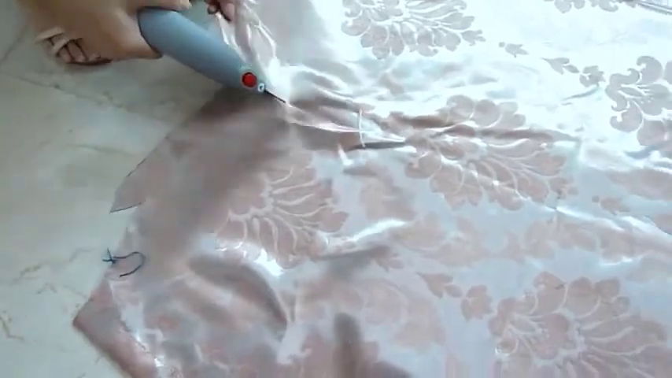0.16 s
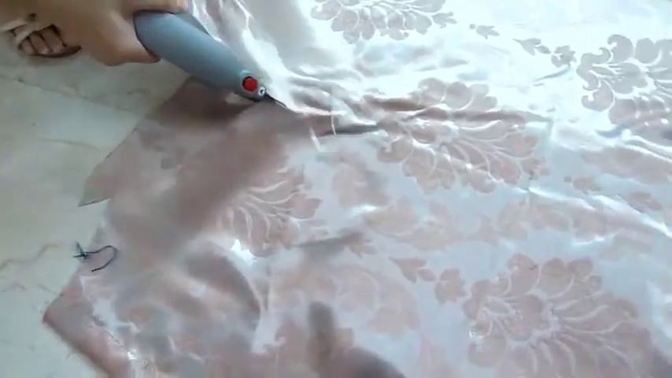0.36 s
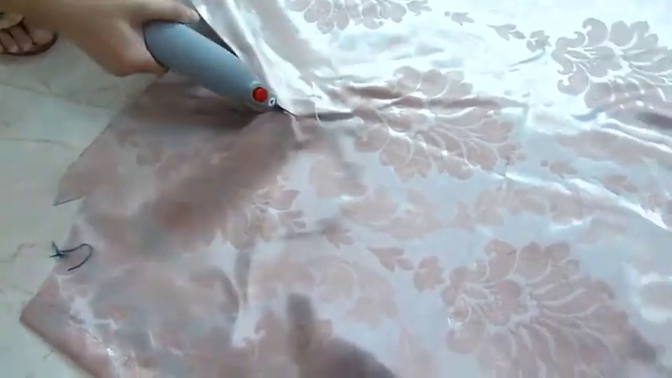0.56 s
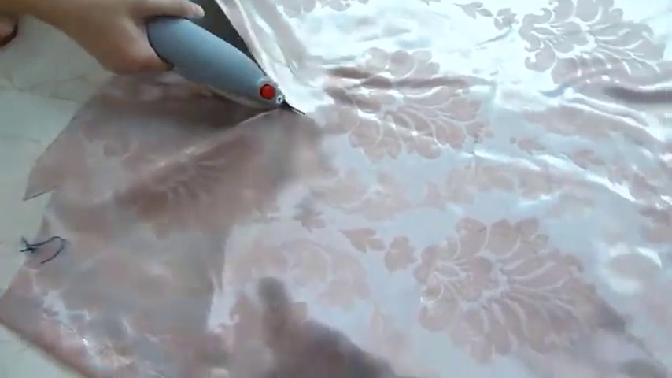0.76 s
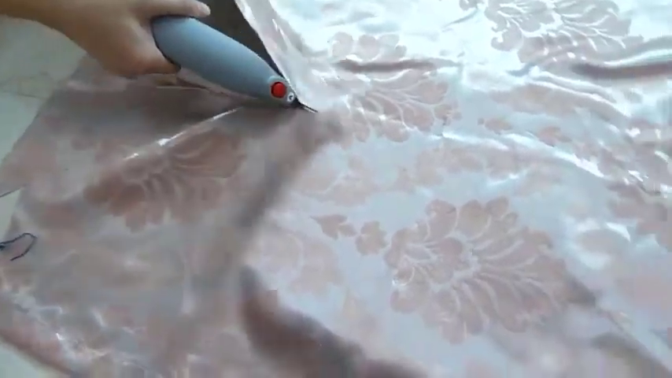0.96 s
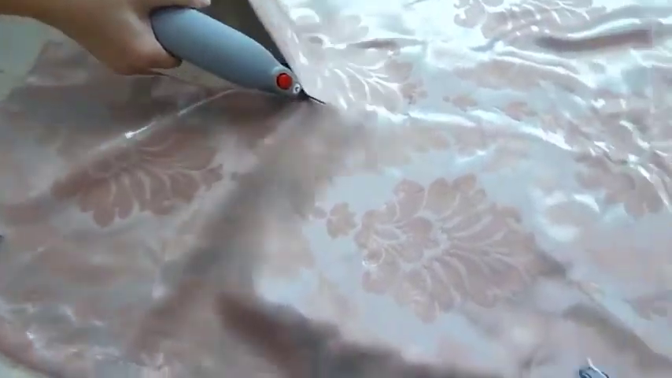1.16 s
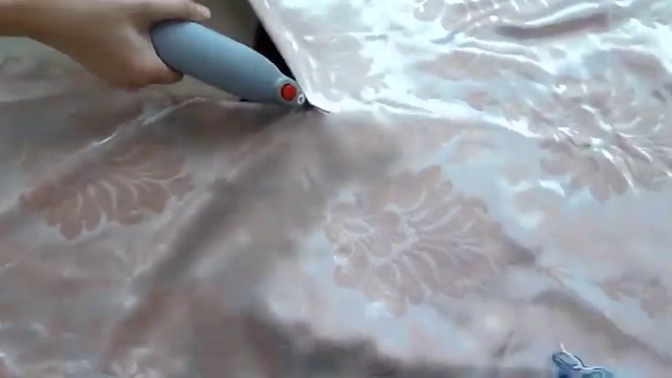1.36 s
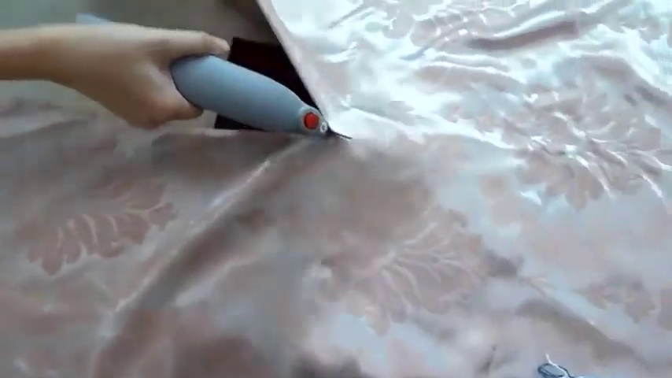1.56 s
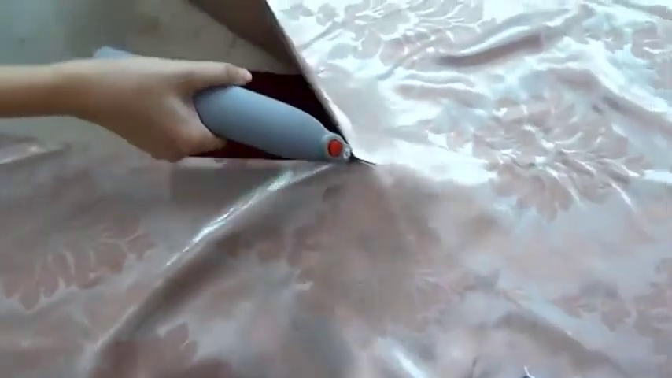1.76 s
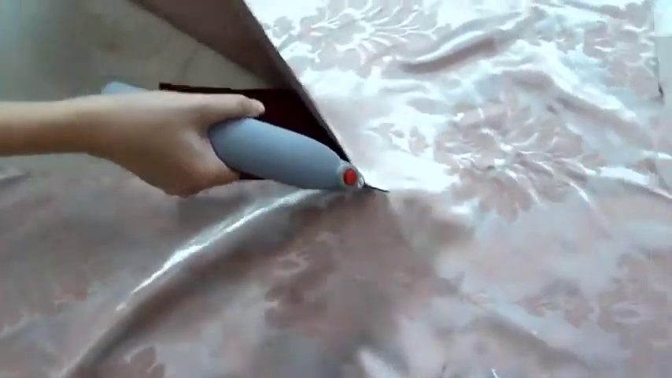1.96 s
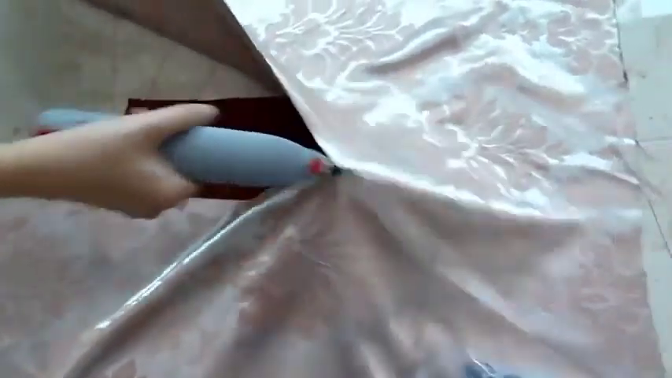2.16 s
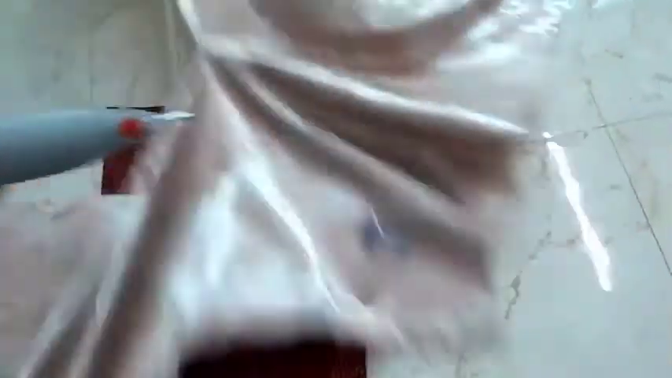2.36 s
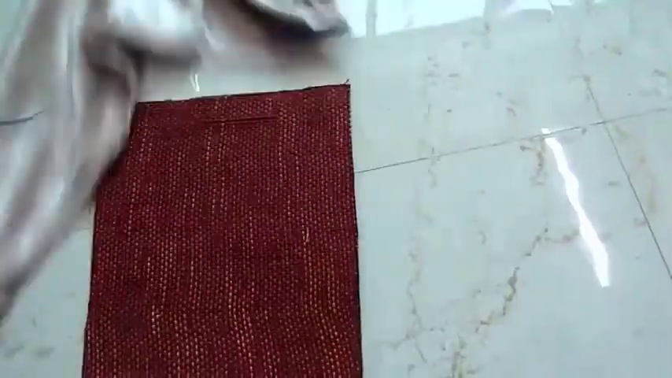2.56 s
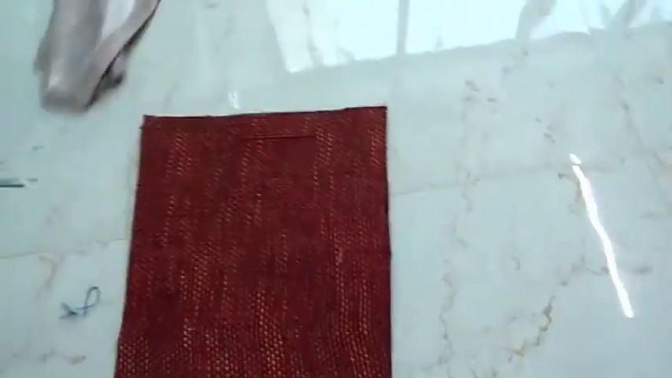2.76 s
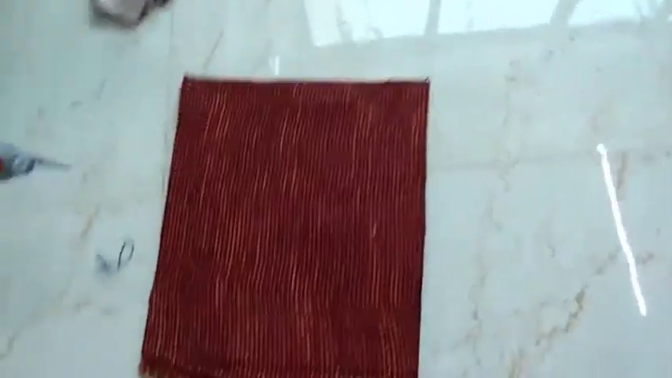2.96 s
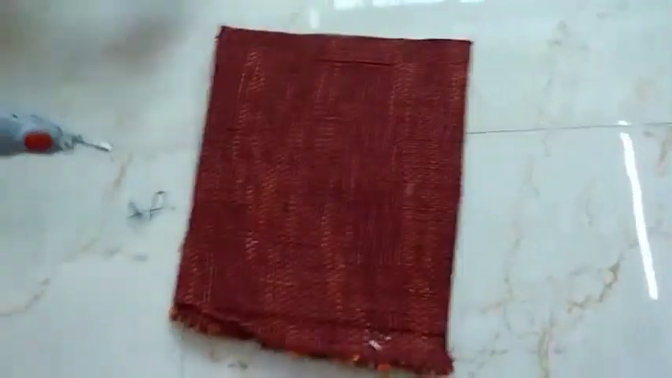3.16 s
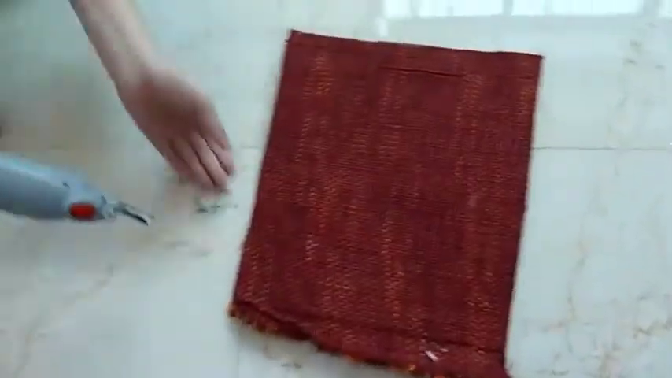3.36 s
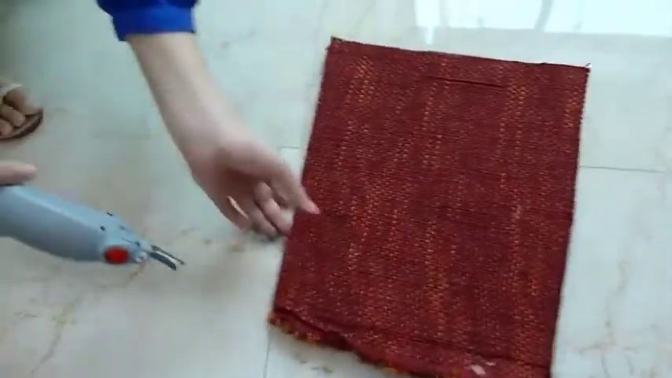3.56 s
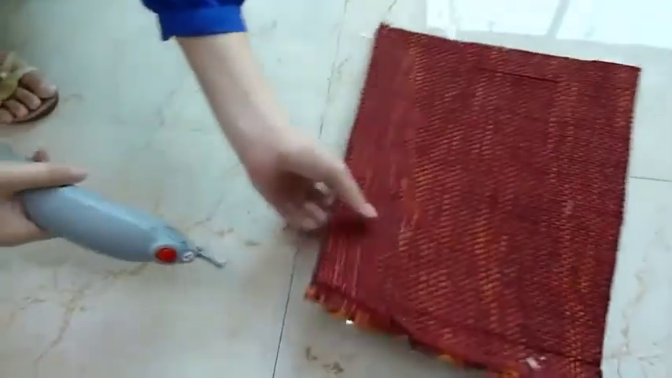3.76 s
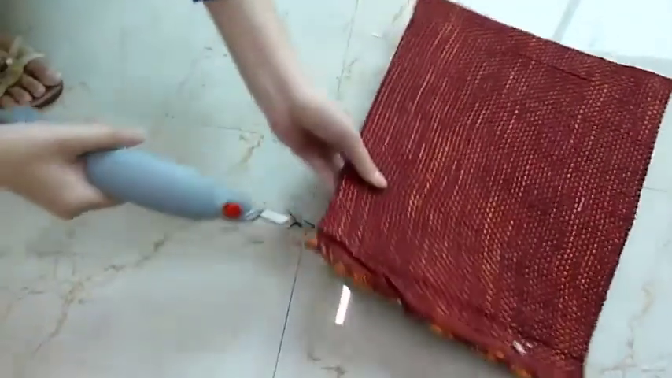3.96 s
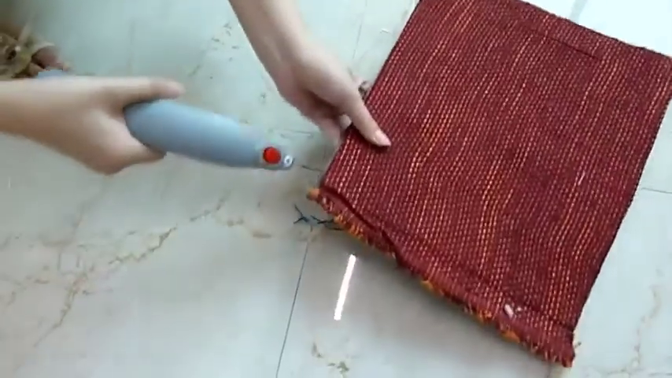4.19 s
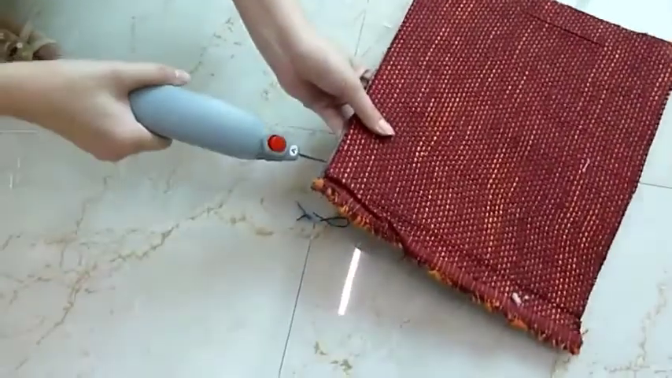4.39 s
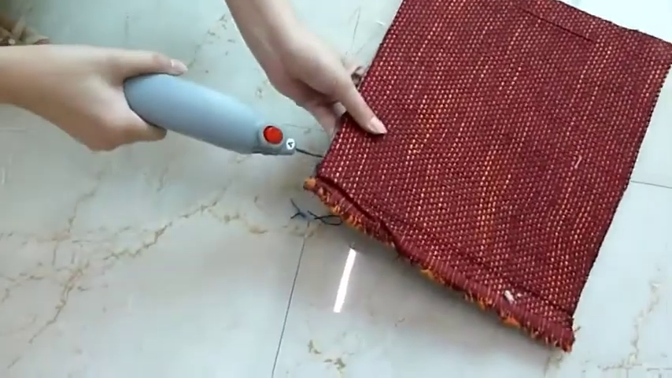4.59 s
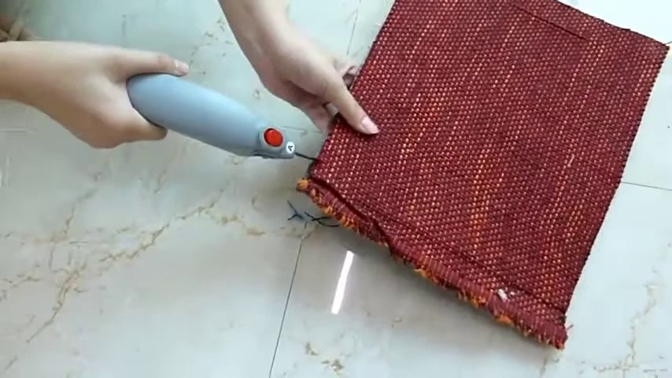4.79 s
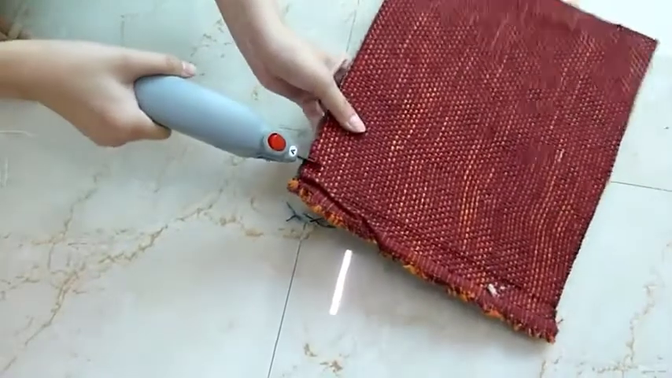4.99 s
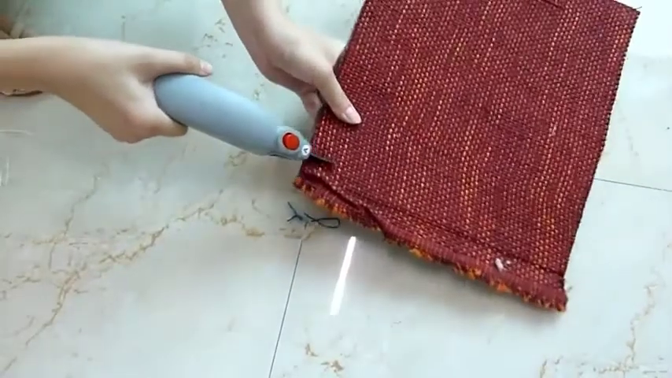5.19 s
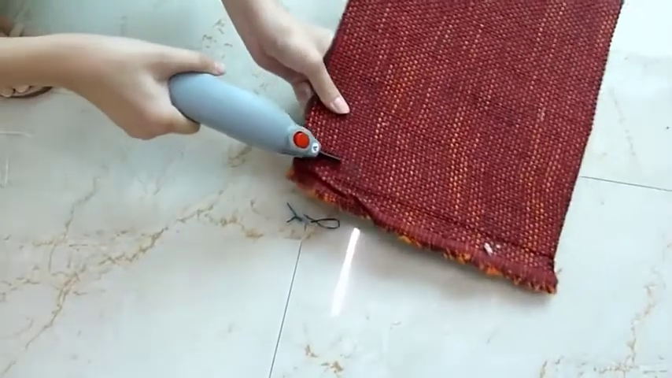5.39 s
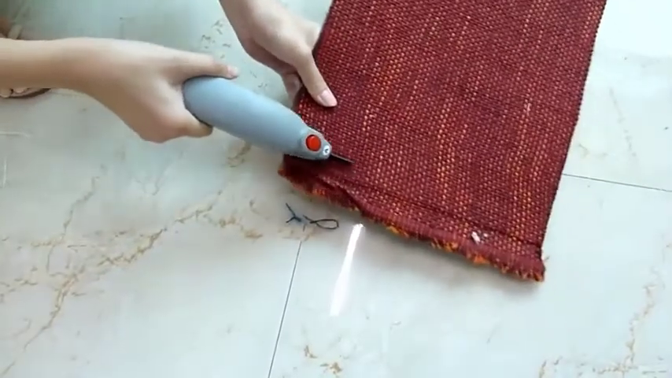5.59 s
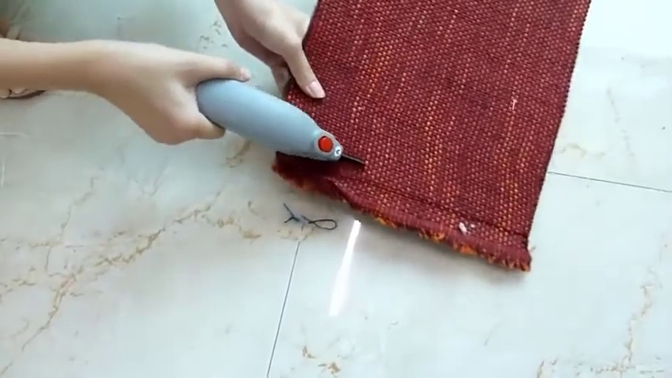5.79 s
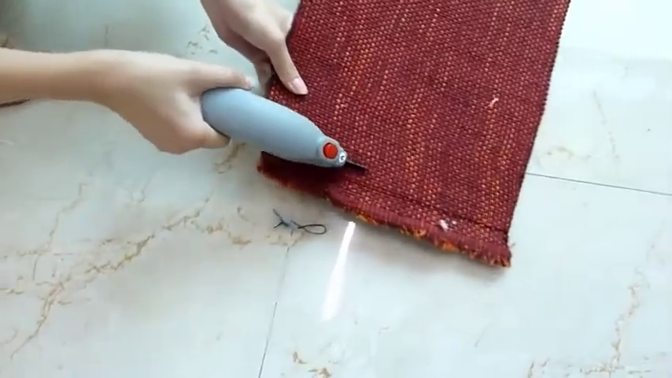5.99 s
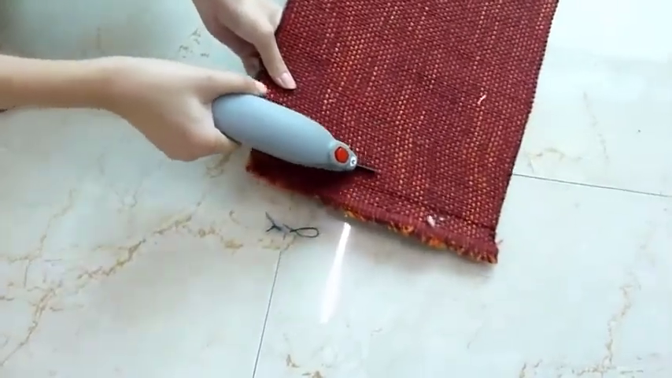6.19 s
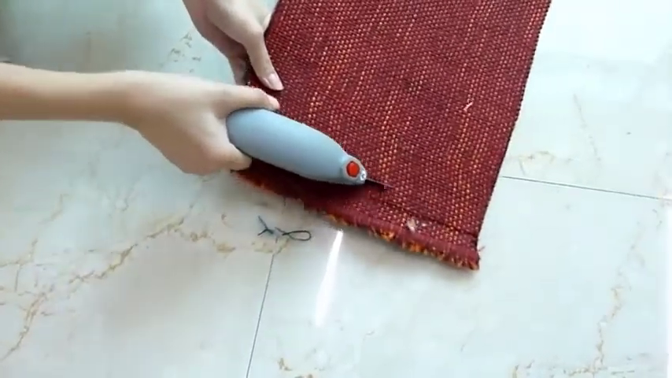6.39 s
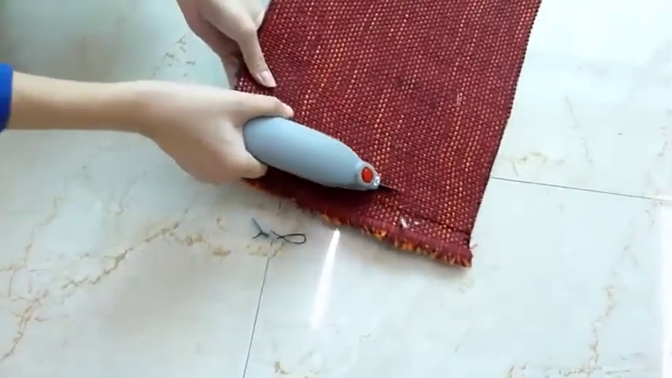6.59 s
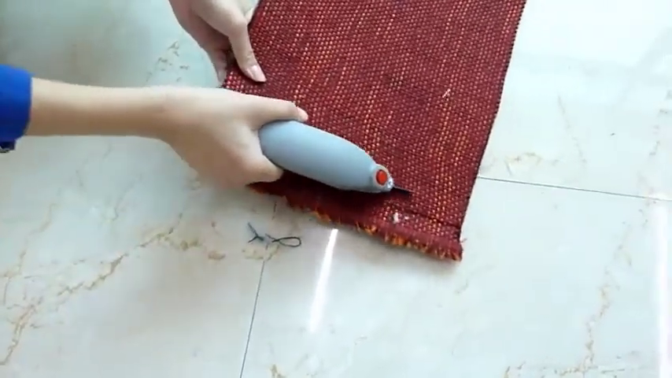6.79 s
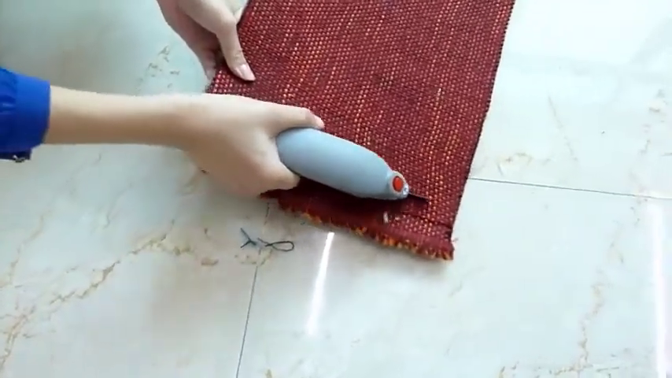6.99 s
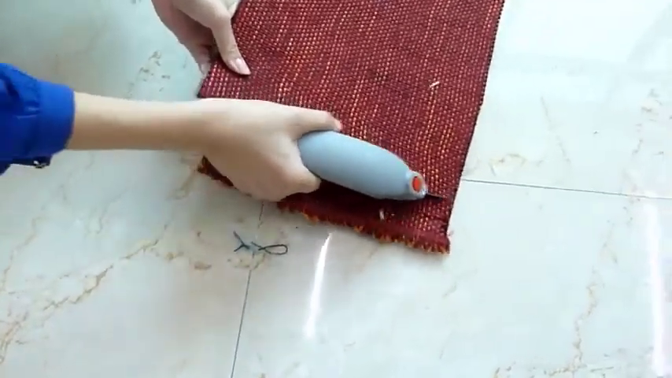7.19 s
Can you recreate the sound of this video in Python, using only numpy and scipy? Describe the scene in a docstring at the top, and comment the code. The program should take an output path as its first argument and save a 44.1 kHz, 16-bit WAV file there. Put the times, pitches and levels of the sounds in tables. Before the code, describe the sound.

A handheld electric cutter buzzes steadily through thin cloth, whines down to a stop, cloth rustles, then it restarts and grinds roughly through thick fabric.

```python
"""Battery scissors run lightly through satin on a tiled floor, coast to a stop, then labour through a thick weave.
A small motor turns a toothed crank wheel; once a turn the blade bites, the wheel slows, and its teeth whine and rasp.
Whines and hums are tones locked to the crank; rasp, knocks and shell rattle are noise coloured by their resonances.
Between the cuts, cloth slides over the tiles and a hand shifts its grip in a quiet, hard room."""
import sys
import numpy as np
from scipy import signal
from scipy.fft import rfft, irfft, next_fast_len
from scipy.io import wavfile
from scipy.ndimage import uniform_filter1d

SR = 44100
rng = np.random.default_rng(int(sys.argv[2]) if len(sys.argv) > 2 else 0)


def wav_record(signal):
    """Record a signal, one row per channel, as 16-bit PCM in the file named by sys.argv[1]."""
    frames = np.transpose(np.atleast_2d(signal))
    bounded = np.clip(frames, -1, 1)
    # unit amplitude maps onto the largest positive 16-bit level
    quanta = np.round(bounded * 32767).astype(np.int16)
    wavfile.write(sys.argv[1], SR, quanta)


N = 319284
T = np.arange(N) / SR  # seconds
HZ = np.fft.rfftfreq(N, 1 / SR)

TEETH = 37  # on the crank wheel
FREE_HZ = 59  # turns a second without load
SWITCH_OFF_S, COAST_S = 2.097, 0.335  # friction brakes the crank evenly to rest
SWITCH_ON_S, SPIN_UP_S = 4.766, 0.1418  # the motor picks up fast, then levels off


def amp(db):
    """Decibels to gain."""
    return 10 ** (np.asarray(db) / 20)


def unit(x, weights=None):
    """Scales to rms 1, weighted over time if weights are given."""
    return x / np.sqrt(np.average(x ** 2, weights=weights) + 1e-20)


def read(points, hz):
    """Reads a spectrum table on a log-frequency axis."""
    f, value = np.transpose(points)
    return np.interp(np.log(hz + 1), np.log(f + 1), value)


def level(rows):
    """A dB curve over time as gain, held at both ends."""
    return amp(np.interp(T, *np.transpose(rows)))


def colour(x, db):
    """Filters by a dB value for each frequency."""
    return irfft(rfft(x) * amp(db), N)


def noise():
    """White noise for the whole scene."""
    return rng.standard_normal(N)


def waver(hz):
    """Slow random wandering of rms 1, fading out above about the given rate."""
    size = next_fast_len(N, True)
    f = np.fft.rfftfreq(size, 1 / SR)[:size // 20]
    phases = 2j * np.pi * rng.random(len(f))
    return unit(irfft(np.exp(phases - (f / hz) ** 2), size)[:N])


def ramp(start_s, length_s):
    """Rises evenly from 0 to 1."""
    return np.clip((T - start_s) / length_s, 0, 1)


def spell(start_s, length_s):
    """Fades in, holds and fades out."""
    return np.minimum(2 * np.sin(np.pi * ramp(start_s, length_s)), 1)


def lobe(turns, centre, width):
    """A smooth bump once a turn; centre and width are in turns."""
    return np.exp(-0.5 * (np.sin(np.pi * (turns - centre)) / (np.pi * width)) ** 2)


def room(x, shrink=1):
    """Dense reflections from tiles and walls, each band dying at its own speed."""
    # Each row: frequency in Hz, time in seconds to fall 60 dB before any shrinking.
    decay_times = [(200, 0.25), (2000, 0.6), (6000, 0.6), (14000, 0.58)]
    burst = rng.standard_normal(SR) * (T[:SR] > 0.003)  # nothing returns in the first 3 ms
    hz, t, z = signal.stft(burst, SR, nperseg=256)
    t60 = shrink * read(decay_times, hz)[:, None]
    tail = signal.istft(z * amp(-60 * t / t60), SR, nperseg=256)[1]
    return signal.fftconvolve(x, tail / np.linalg.norm(tail))[:N]


def spread(x, side):
    """Reflections reach the two microphones differently."""
    apart = colour(room(x, shrink=0.16), read(side, HZ))
    return np.array([x + apart, x - apart])


def room_air():
    """The quiet room's steady noise: coloured noise that wavers slightly."""
    # Each row: frequency in Hz, relative level in dB.
    air_colour = [(25, -8), (48, -2), (80, -6.5), (125, -1), (190, -1.5), (350, 1.5), (570, -6.5),
                  (830, -5.5), (1100, -10), (1800, -13.5), (3600, -18.5), (7000, -27), (15000, -31)]
    return amp(-47.5) * unit(colour(noise(), read(air_colour, HZ))) * amp(0.4 * waver(17))


def cloth_slides():
    """Cloth hisses over the tiles with each pull, and rustles faintly while the tool is off."""
    # Each row: start in seconds, length in seconds, relative peak level in dB.
    slides = [(2.38, 0.24, -64), (2.84, 0.31, -53.5), (3.325, 0.46, -57.5), (4.1, 0.6, -73),
              (4.56, 0.63, -64)]
    # Each row: frequency in Hz, relative level in dB.
    hiss_colour = [(100, -15), (600, 12), (1500, 1.5), (3500, 3), (7000, 2), (11000, -2), (15000, -11)]
    skew = 0.61  # a pull peaks before its middle
    sliding = sum(amp(db) * abs(np.sin(np.pi * ramp(s, length) ** skew)) for s, length, db in slides)
    sliding = sliding + amp(-62) * (T > SWITCH_OFF_S) * (T < SWITCH_ON_S)
    hiss = unit(colour(noise() * amp(1.0 * waver(300)), read(hiss_colour, HZ)))
    return amp(2.5) * sliding * hiss


def handling():
    """Sliding cloth, with short dead taps of switch, blade and hands: decaying bursts of band noise."""
    # Each row: start in seconds, relative peak in dB, pitch in Hz, width in octaves, decay in seconds.
    taps = [(2.179, -10, 3940, 0.37, 0.0021), (2.849, -33.5, 4530, 0.68, 0.0016),
            (2.918, -36, 2670, .15, 0.0043), (2.944, -29.5, 945, 0.14, 0.002),
            (2.978, -37, 450, 0.56, 0.0073), (2.989, -32, 342, 1.0, 0.0075), (3.211, -44, 700, 1.2, .004),
            (4.323, -45, 900, 1.4, .008), (4.767, -16.5, 4000, 4.9, 0.0042),
            (4.913, -17, 1360, 0.67, 0.0032), (4.922, -19, 640, 1, 0.012), (6.671, -18, 1100, 0.71, 0.0056)]
    out = cloth_slides()
    t, hz = T[:4096], np.fft.rfftfreq(4096, 1 / SR)
    for s, db, pitch, octaves, decay in taps:
        band = 1 / (1 + (np.log2((hz + 1) / pitch) / octaves) ** 4)
        ring = irfft(rfft(rng.standard_normal(len(t))) * band) * np.exp(-t / decay)
        out[int(s * SR):][:len(t)] += amp(db) * ring / abs(ring).max()
    return out


def housing(hz):
    """Gain in dB of the plastic housing, whose resonances raise or lower bands."""
    # Each row: frequency in Hz, width in Hz, gain in dB.
    resonances = [(2526, 750, -4.5), (3360, 540, 0), (3510, 450, -2.5), (4160, 370, 2), (5140, 110, -8),
                  (5500, 170, 2.5), (6500, 190, -4), (8080, 520, 2.5), (9380, 340, 4.5), (12500, 240, 4)]
    return sum(db * np.exp(-2 * ((hz - f) / width) ** 2) for f, width, db in resonances)


def gearbox(x):
    """Rings the gearbox's modes, so a sweeping tone flares and lingers at each one."""
    # Modes that the teeth excite. Each row: frequency in Hz, width in Hz, strength in dB.
    modes = [(1767, 216, 2), (1958, 194, 2.5), (2127, 133, -0.5), (2620, 234, 6), (3316, 350, 5.5),
             (3970, 210, 4.5), (4443, 310, 5), (5610, 330, -0.5), (7080, 270, 0), (7690, 190, 7),
             (9060, 360, 4)]
    response = sum(amp(db) / (1 + 1.3j * (HZ - hz) / width) ** 2 for hz, width, db in modes)
    return irfft(rfft(x) * response, N)


def shell(hz=810, width_hz=210):
    """The lowest resonance of the hollow handle, shaken by the loose gears."""
    return unit(colour(noise(), -20 * np.log10(1 + ((HZ - hz) / width_hz * 2) ** 2)))


def crank(hz, at_s, start, load, sag, wobble):
    """Turns of the crank, even and as the wheel moves: cloth makes both wobble, and each bite brakes the wheel."""
    turns = np.cumsum(hz) / SR
    turns = turns - turns[int(at_s * SR)] + start + wobble * waver(10.3)
    depth = load * np.clip(sag * (1 - hz / FREE_HZ), 0.035, 0.16)  # slower means braked harder
    # the mean is taken off so that braking leaves the average speed alone
    brake = lobe(turns, 0.12, 0.12) - lobe(np.arange(100) / 100, 0.12, 0.12).mean()
    return turns, turns - np.cumsum(depth * brake * hz) / SR


def grit(turns, repeat, size=760):
    """Surface roughness: a share of it comes round again with every turn, the rest is new."""
    worn = np.interp(turns % 1 * size, np.arange(size), rng.standard_normal(size))
    return np.sqrt(repeat) * unit(worn) + np.sqrt(1 - repeat) * noise()


def whine(partials, wheel, bite, jitter, flutter_db):
    """The tooth tone and overtones swell with each bite and flare where speed puts them on a gearbox mode."""
    teeth = TEETH * wheel + jitter * waver(207)
    tones = 0
    for k, db in partials:
        strength = amp(db + flutter_db * waver(210))
        tones = tones + strength * np.cos(2 * np.pi * (k * teeth + rng.random()))
    return gearbox(tones * bite)


def rasp(turns, wheel, bite, running, spectrum, repeat, chatter, grain_db):
    """Each passing tooth scrapes, hardest during the bite; snapping threads make it grainy."""
    scrape = (1 + chatter * np.cos(2 * np.pi * TEETH * wheel)) * amp(grain_db * waver(950))
    rough = grit(turns, repeat) * scrape * bite
    return unit(colour(rough, read(spectrum, HZ) + housing(HZ)), running)


def knocks(turns, running, at, decay_turns, uneven_db):
    """The slack linkage slaps once a turn: a sharp crack of uneven strength."""
    # Each row: frequency in Hz, relative level in dB.
    knock_colour = [(100, -50), (1500, -16), (2200, -4), (3200, -7), (4100, 7), (5000, 1), (5650, 4),
                    (6750, 2), (7800, -11), (10000, -11), (15000, -24)]
    fading = np.exp(-((turns - at) % 1) / decay_turns)
    blow = fading * amp(uneven_db * waver(50)) * grit(turns, repeat=0.55)
    return unit(colour(blow, read(knock_colour, HZ) + housing(HZ)), running)


def hum(turns, rows):
    """Low shaft tones that come and go as the grip changes."""
    tones = 0
    for k, s, length, db in rows:
        tones = tones + amp(db) * spell(s, length) * np.cos(2 * np.pi * (k * turns + rng.random()))
    return np.sqrt(2) * tones * amp(1.0 * waver(30))


def satin_cut():
    """Nearly free running: a soft bite and a knock on each return stroke, then it coasts; clatter and clear hum."""
    # Crank speed while the switch is held. Each row: time in seconds, turns a second.
    speed = [(0.0, 59.12), (0.19, 59.27), (0.66, 58.08), (1.0, 58.28), (1.07, 58.49), (1.55, 58.0),
             (1.98, 56.24), (2.1, 56.81)]
    # Gear whine ahead of the gearbox. Each row: multiple of the tooth rate, relative level in dB.
    partials = [(1, -22), (2, -36), (3, -40), (4, -40), (5, -38)]
    # Colour of the rasp. Each row: frequency in Hz, relative level in dB.
    rasp_colour = [(60, -47), (250, -28.5), (540, -16.5), (780, -13.5), (1150, -12), (1750, -9), (2350, 4),
                   (3400, -4), (4200, -2.5), (5500, -2.5), (6600, -1), (7400, -8.5), (10000, -9.5),
                   (15500, -17)]
    # The motor's own tone, boom of the tool against the floor, rattle of the hollow shell and
    # knock of the linkage. Each row: time in seconds, relative level in dB.
    motor_level, boom_level = [(0, -35.5), (.55, -37.5), (.72, -36), (1.3, -40.5), (1.6, -38), (2.1, -39)], [(0, -66), (1.3, -60), (1.6, -53.5), (2.1, -58)]
    shell_level, knock_level = [(0, -73), (.7, -50), (1.5, -45.5), (2.1, -41.5)], [(0, -28), (.25, -28.5), (.45, -29.5), (.8, -27.5),
                                               (1.3, -28), (1.6, -27.5), (2.1, -29.5)]
    # Shaft tones. Each row: multiple of crank speed, start and length in seconds, relative level in dB.
    shaft_tones = [(2, 0.58, 1.12, -61), (8, 1.1, 1.4, -60), (10, -0.12, .7, -51.5), (10, 0.61, 1.56, -64),
                   (13, .35, 1.22, -46.5), (16, -0.5, .7, -49.5), (17, -0.16, .7, -47), (18, 0.6, 1.9, -45),
                   (20, .2, 0.84, -50), (22, 1.53, .7, -49)]

    running = 1 - ramp(SWITCH_OFF_S, COAST_S)
    load = 1 - ramp(SWITCH_OFF_S, 0.026)
    hz = np.interp(T, *np.transpose(speed)) * running
    turns, wheel = crank(hz, at_s=0, start=0.724, load=load, sag=0.3, wobble=0.005)

    bite = 1 + 0.6 * lobe(turns, -0.06, 0.11)
    grind = rasp(turns, wheel, bite, running, rasp_colour, repeat=0.3, chatter=0.7, grain_db=1.2)
    knock = knocks(turns, running, at=0.335, decay_turns=0.07, uneven_db=1.3)
    # thin cloth: the scraping grows as a power of the speed
    scrape = running ** 2.19 * (amp(-24) * grind + level(knock_level) * knock)

    pressure = 0.03 + 1.4 * lobe(turns, -0.08, 0.1)
    swell = amp(1.5 * waver(20))  # the whine swells unevenly from bite to bite
    gears = whine(partials, wheel, load * pressure * swell, jitter=0.05, flutter_db=1.3)

    motor_tone = np.cos(2 * np.pi * 12 * np.cumsum(hz) / SR)  # twelve times the crank speed
    motor = np.sqrt(2) * level(motor_level) * load * amp(0.8 * waver(50)) * motor_tone
    boom = np.sqrt(2) * level(boom_level) * load * np.cos(2 * np.pi * 4 * turns)
    rattle = level(shell_level) * running ** 2 * shell()
    return scrape + gears + rattle, motor + boom + load * hum(turns, shaft_tones)


def weave_cut():
    """The motor chatters up, then thick cloth drags it: each bite a falling chirp, a crunch and a rising squeak."""
    # Crank speed once spun up. Each row: time in seconds, turns a second.
    speed = [(4.9, 53.87), (5.4, 45.13), (5.51, 43.69), (5.74, 43.51), (5.82, 41.61), (6.19, 38.77),
             (6.39, 41.32), (6.51, 36.31), (6.58, 39.39), (6.9, 41.72), (7.24, 40.17)]
    # Gear whine ahead of the gearbox. Each row: multiple of the tooth rate, relative level in dB.
    partials = [(1, -20.5), (2, -16), (3, -22), (4, -20.5), (5, -24)]
    # Colour of the rasp. Each row: frequency in Hz, relative level in dB.
    rasp_colour = [(50, -19), (140, -24), (270, -15.5), (540, -11.5), (780, -10.5), (1150, -10), (1600, -5),
                   (1950, -2.5), (2600, 4.5), (3600, 1), (4400, -1.5), (6100, 0), (8000, -7), (10000, -5),
                   (15500, -14)]
    # Rasp in the thick cloth, and squeak as the wheel springs free after each bite.
    # Each row: time in seconds, relative level in dB.
    rasp_level, squeak_level = [(4.9, -23.5), (5.13, -25), (5.4, -23.5), (6.25, -24), (6.4, -26),
                                (6.8, -25), (7.24, -26)], [(4.9, -38), (5.3, -32), (5.5, -21.5), (5.85, -21),
                                                    (6.0, -30), (6.65, -32), (6.8, -24.5), (7.24, -26.5)]
    # Shaft tones. Each row: multiple of crank speed, start and length in seconds, relative level in dB.
    shaft_tones = [(5, 5.0, .5, -58.5), (3, 5.85, 0.504, -59.5)]

    running = 1 - (1 - ramp(SWITCH_ON_S, SPIN_UP_S)) ** 2.196
    # the starting torque shakes the loose gears hardest 0.061 s after the switch closes
    age = np.maximum(T - SWITCH_ON_S, 0) / 0.061
    surge = age ** 2 * np.exp(1 - age ** 2)
    load = ramp(4.85, 0.06)
    working_hz = np.interp(T, *np.transpose(speed))
    turns, wheel = crank(working_hz * running, at_s=4.9, start=0.15, load=load, sag=0.55, wobble=0.004)

    loose = (1 - load) * amp(1.4 * waver(250))
    bite = (loose + load * (0.56 + 0.85 * lobe(turns, -0.03, 0.22))) * amp(0.4 * waver(60))
    scrape = rasp(turns, wheel, bite, running, rasp_colour, repeat=0.35, chatter=0.58, grain_db=2.1)

    # the unloaded gears sweep up in a ragged whine, then bear hardest at one point of the turn
    pressure = amp(-7) * running * loose + load * 1.02 * lobe(turns, 0.0087, 0.15)
    jitter, flutter_db = 0.035 + 0.1 * (1 - load), 1.4 + 1.5 * (1 - load)
    teeth = whine(partials, wheel, pressure, jitter, flutter_db)
    gears = amp(0.5) * (working_hz / FREE_HZ) ** 1.82 * teeth  # faster teeth hit harder

    squeak_swell = load * lobe(turns, 0.2, 0.075) * amp(1.5 * waver(60))
    squeak = squeak_swell * np.cos(2 * np.pi * (3 * TEETH * wheel + 0.05 * waver(184)))
    rattle = (amp(-47.5) * running + amp(-38.5) * surge) * shell()
    cutting = (running + amp(-3.5) * surge) * (level(rasp_level) * scrape + gears)
    return cutting + level(squeak_level) * squeak + rattle + hum(turns, shaft_tones)


def vary(x):
    """Bands of the tool's sound swell or sink for a while as the cut goes on."""
    # Each row: start in seconds, length in seconds, centre in Hz, width in Hz, change in dB.
    spells = [(1.0, 0.8, 2360, 300, 1.5), (2.04, 0.57, 1600, 2600, 4.5), (4.775, 0.25, 5500, 350, 4),
              (4.77, 0.043, 2700, 700, 3.5), (4.6, 0.12, 4000, 600, 4), (4.93, .56, 1830, 440, 2.5),
              (4.98, 0.29, 3400, 350, -2), (5.1, 1.03, 1650, 400, -1), (5.22, 0.6, 3300, 480, 1.5),
              (5.5, 0.42, 2700, 370, -2), (5.9, 0.52, 2680, 350, 2), (6.55, 0.89, 2740, 300, 3),
              (6.5, .9, 3050, 400, -3), (6.452, 0.17, 2600, 300, 1.5), (6.397, 0.9, 5580, 410, 5),
              (6.678, 0.5, 6700, 430, 7), (6.6, 0.42, 4100, 280, 2)]
    out, spectrum = x.copy(), rfft(x)
    for s, length, hz, width, db in spells:
        band = irfft(spectrum * np.exp(-2 * ((HZ - hz) / width) ** 2), N)
        out += (amp(db) - 1) * spell(s, length) * band
    return out


def place(x, tones, wet_db):
    """Sets the tool before two microphones, its treble to the left; the clatter rings on, the hum stays drier."""
    # Each row: frequency in Hz, side over mid in dB.
    tool_side = [(100, -8), (650, -32.5), (1200, -19), (3000, -13.5), (5500, -5.5), (9000, -6), (15000, -5)]
    # Each row: frequency in Hz, left over right in dB.
    lean = [(700, 2), (1400, 3.5), (3000, 2), (6500, 5.5), (10000, 4), (15000, 2.5)]
    # The tool's drift across the picture. Each row: time in seconds, left over right in dB.
    drift = [(0, -2), (1.2, -2), (2.1, -3), (4.8, -1.5), (5.3, -2.1), (7.2, -3.5)]
    ringing = colour(room(x), read([(700, 6.0), (2500, 2.5)], HZ))  # (Hz, dB)
    left, right = spread(x + tones + amp(wet_db) * ringing, tool_side)
    # each side takes half of the difference
    drift_db, lean_db = np.interp(T, *np.transpose(drift)) / 2, read(lean, HZ) / 2
    return np.array([colour(left, lean_db) * amp(drift_db), colour(right, -lean_db) * amp(-drift_db)])


def scene():
    """Two cuts, the handling between them, and the room's own noise."""
    # Each row: frequency in Hz, side over mid in dB.
    quiet_side = [(60, -7), (380, -9), (950, -5), (2400, -2.5), (6000, -1.5), (15000, 0.5)]
    air = room_air()
    hands = handling()
    quiet = spread(air + hands + amp(-9.0) * room(hands), quiet_side)
    clatter, tones = satin_cut()
    tool = place(vary(clatter + weave_cut()), tones, wet_db=-10.5)
    return amp(4.0) * tool + quiet


def record(dry, threshold_db=-36, slope=0.27, recovery_db=14):
    """Gain control turns loud sound down and recovers slowly, in dB a second; then the treble is cut off."""
    power_db = 10 * np.log10(abs(uniform_filter1d((dry ** 2).mean(0), size=2000)) + 1e-12)
    cut_db = slope * np.maximum(power_db - threshold_db, 0)
    held_db = np.maximum.accumulate(cut_db + recovery_db * T) - recovery_db * T
    ducked = dry * amp(-uniform_filter1d(held_db, size=800))
    low_pass = signal.firwin(511, 15300, window=("kaiser", 9), fs=SR)  # edge in Hz
    return signal.oaconvolve(ducked, low_pass[None], "same")


dry = scene()
out = record(dry)
wav_record(out)
```